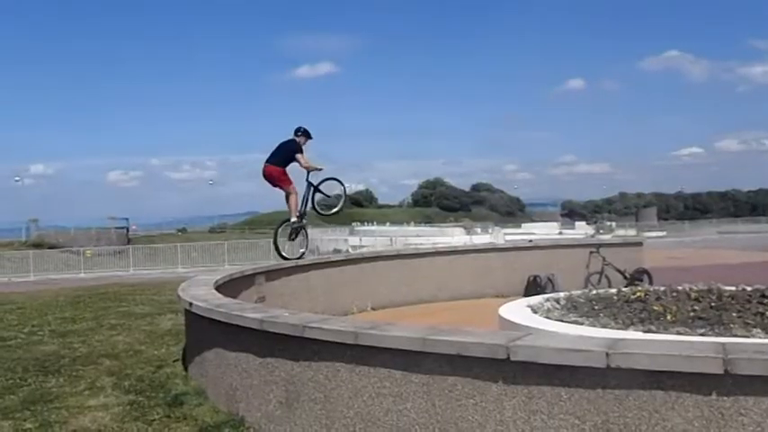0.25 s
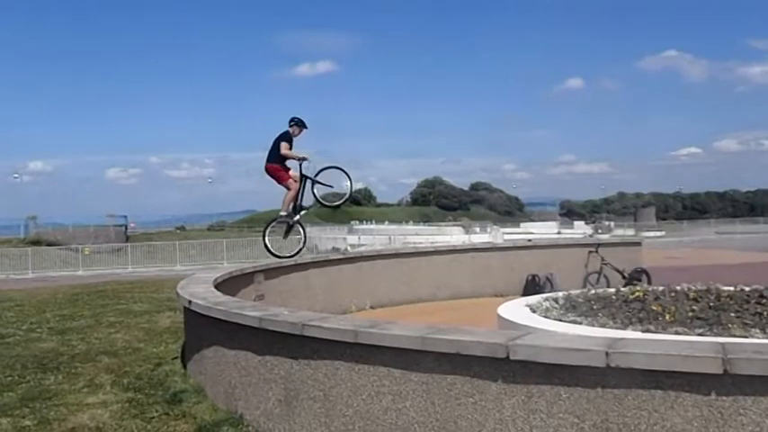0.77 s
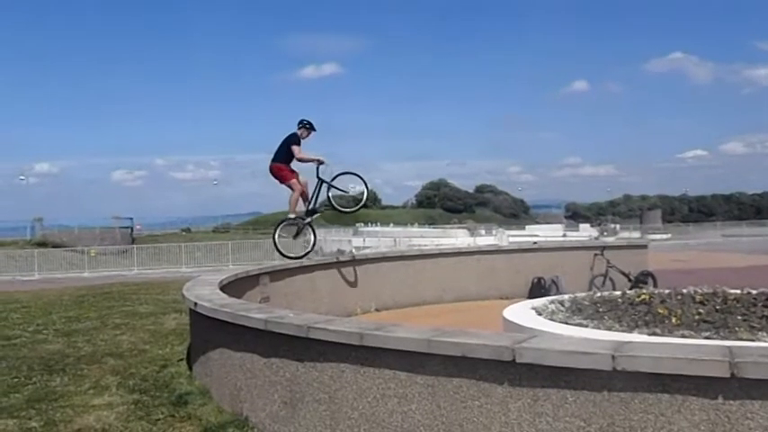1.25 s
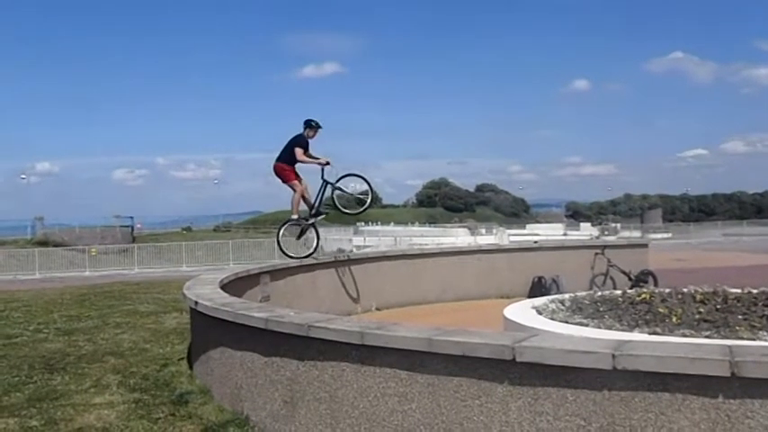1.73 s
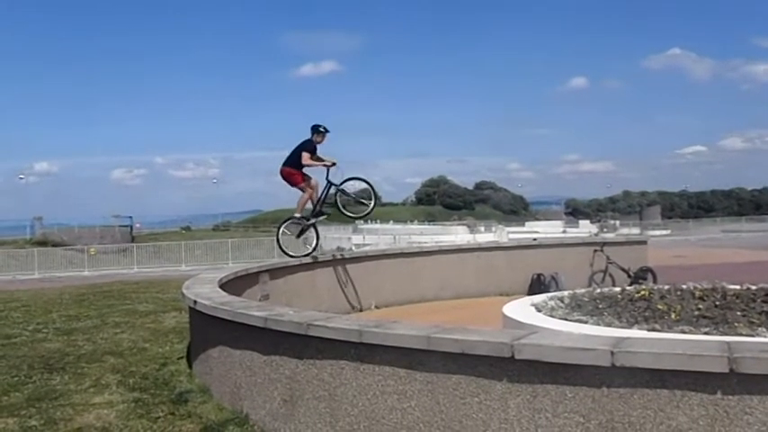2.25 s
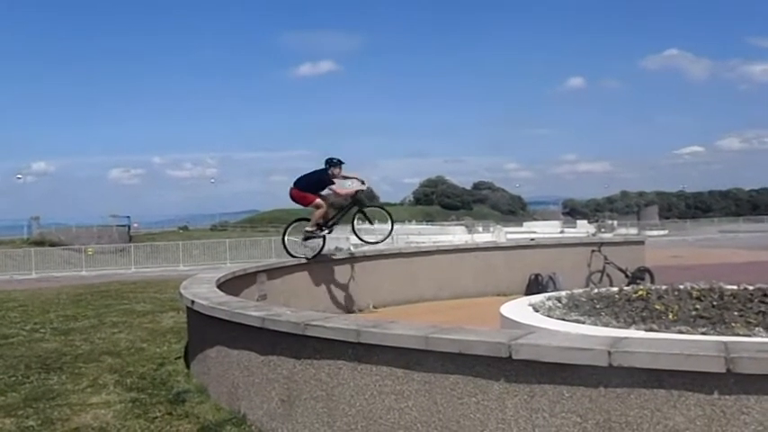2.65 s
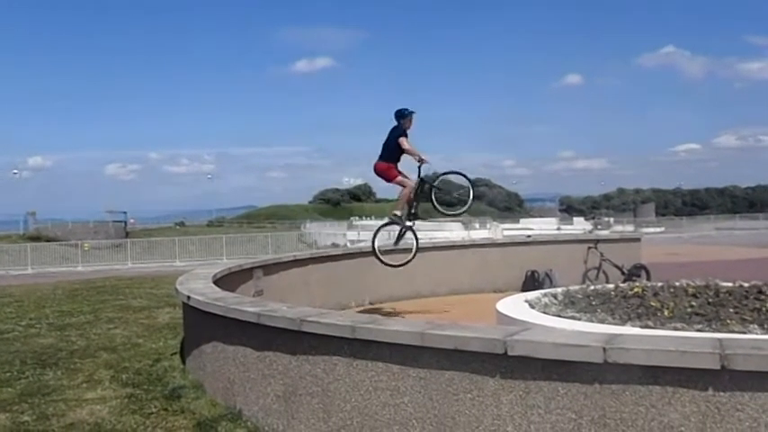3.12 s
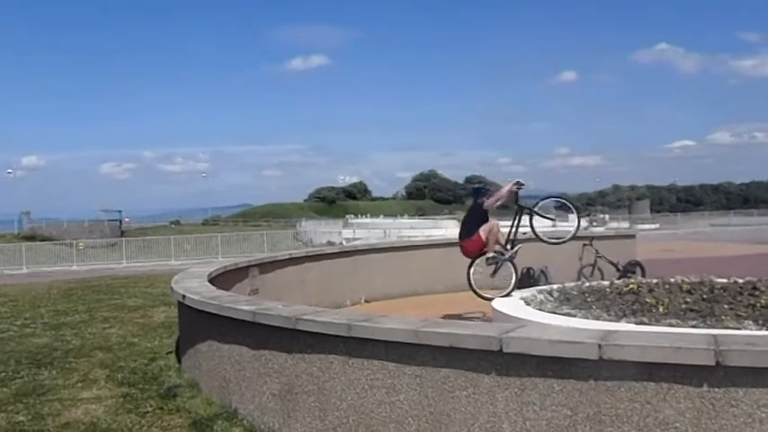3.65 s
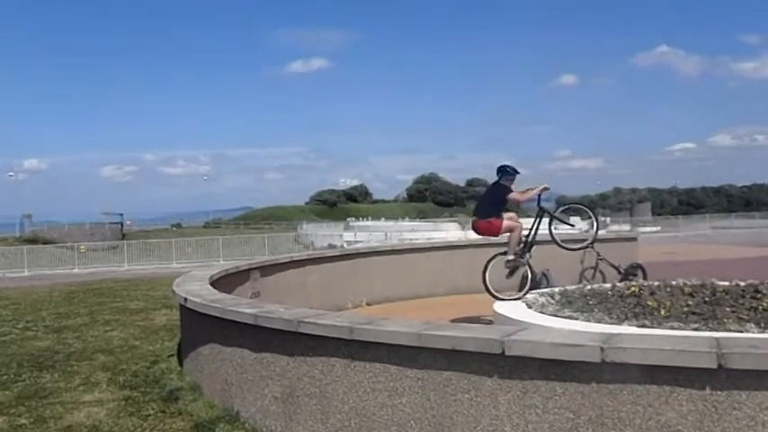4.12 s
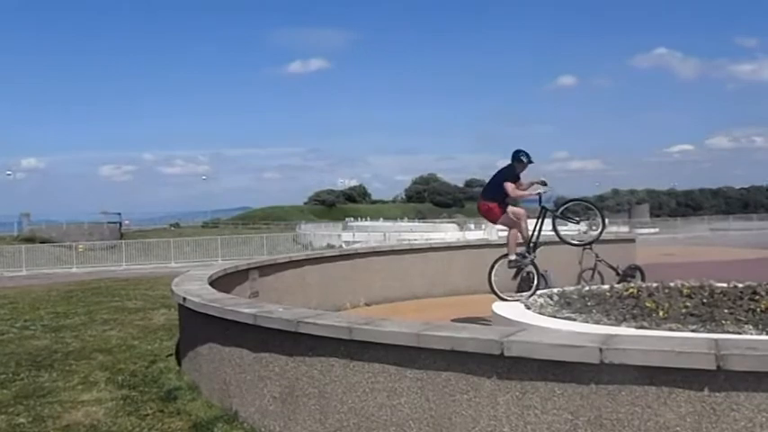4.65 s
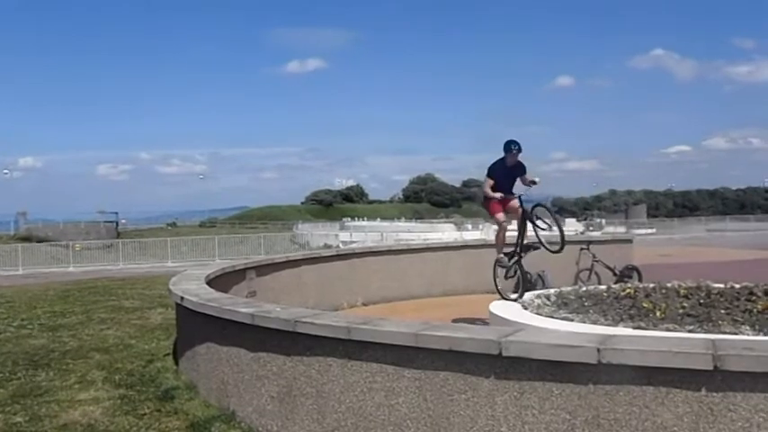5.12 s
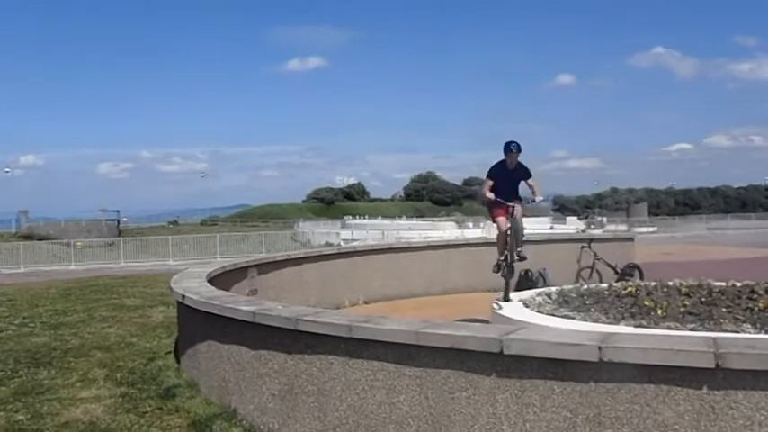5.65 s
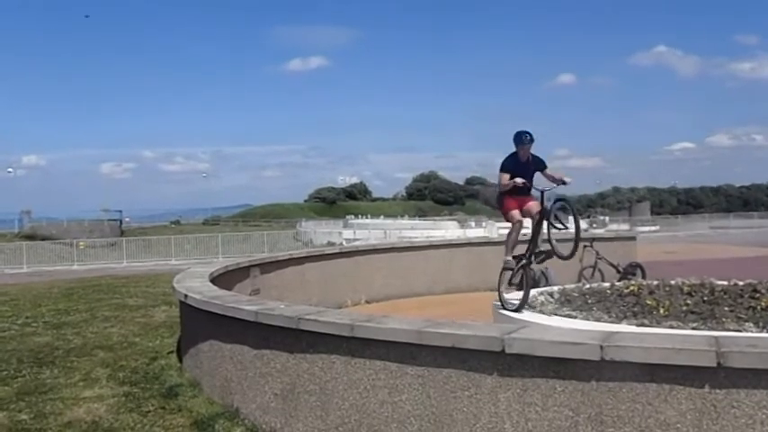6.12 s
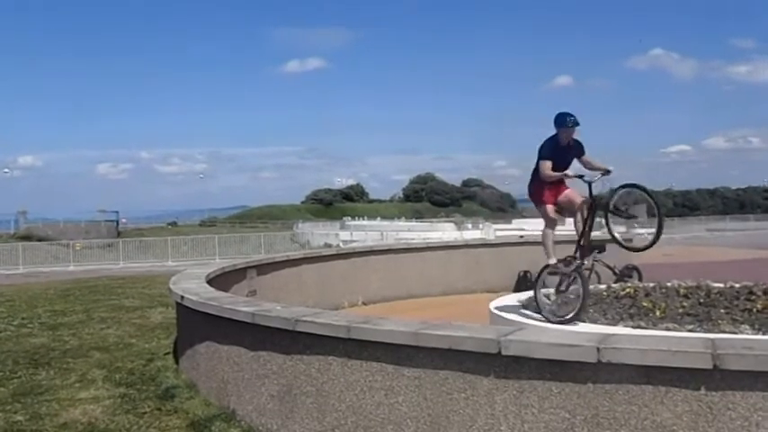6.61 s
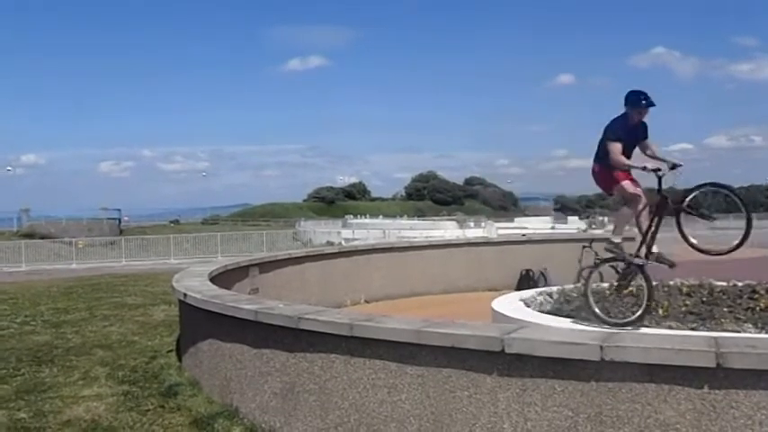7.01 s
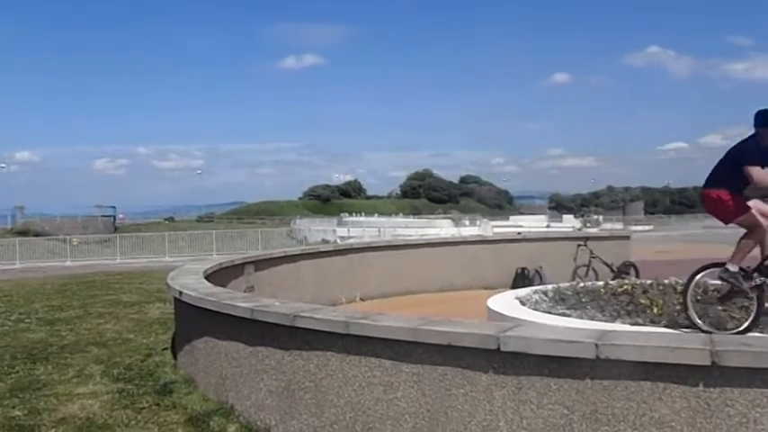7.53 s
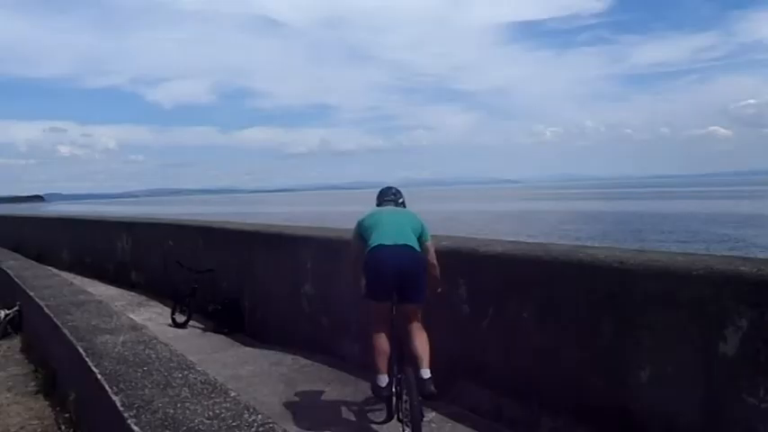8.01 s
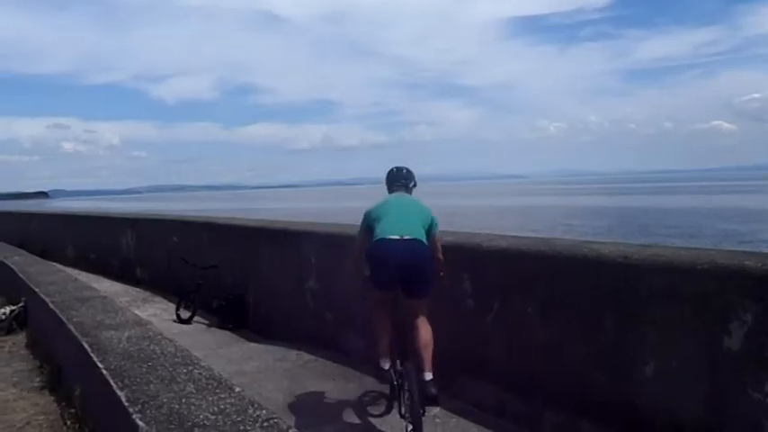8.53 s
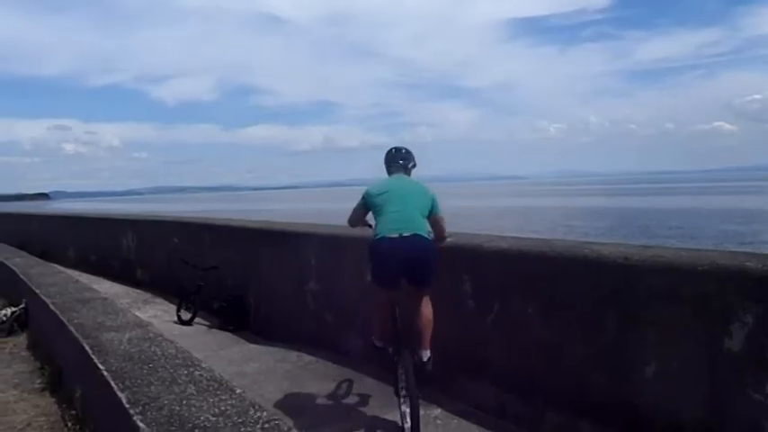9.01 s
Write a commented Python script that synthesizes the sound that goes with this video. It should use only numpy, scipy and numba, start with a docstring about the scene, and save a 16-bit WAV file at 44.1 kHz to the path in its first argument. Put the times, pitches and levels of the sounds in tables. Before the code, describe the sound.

A trials bicycle on concrete walls, heard by a single microphone in gusty wind. Isolated pawl clicks mark balancing; short ratchet whirs precede hops. Rim brakes grab with scraping, nasal honks, leaving metallic rim and spoke ringing. The loudest landing is a clustered clatter around 3.4 seconds. After more hops, the hiss and wind give way to a low, ebbing sea wash, a few clicks and one knock.

```python
"""Concrete walls by the sea, wind on the microphone; from 7.93 s a sea wall with the wash of the sea behind.
A trials bicycle hops on its back wheel. Pawl drops make the freewheel tick, and whir at pedal kicks.
On landing the rim brake grabs: stick-slip noise scrapes, harmonics honk briefly, rim and spokes ring on.
Coloured noise makes knocks, scuffs and cracks on the concrete, and the sea; narrow noise bands make
the brake pads squeak; low noise is wind. The microphone hisses with a thin whine until the sea wall."""
import sys
import numpy as np
from scipy import signal
from scipy.fft import rfft, irfft
from scipy.io import wavfile
from scipy.ndimage import uniform_filter1d
from numba import njit

SR = 44100
rng = np.random.default_rng(int(sys.argv[2]) if len(sys.argv) > 2 else 0)


def inscribe(sig):
    """Save sig as 16-bit PCM at rate SR to the path in sys.argv[1].

    A 1-D sig is mono; a 2-D sig holds one channel per row.
    Samples are clipped to [-1, 1] before scaling.
    """
    pcm = np.round(np.clip(np.atleast_2d(sig).T, -1, 1) * 32767)
    wavfile.write(sys.argv[1], SR, pcm.astype(np.int16))


N = 408366
T_S = np.arange(N) / SR

# open air and microphone hiss, spectrum: f/Hz, relative level/dB
AIR_COLOUR = [(240, -31), (400, -2.5), (569, -2.5), (643, -2), (1200, -4.5), (1300, -5), (2670, -10.5),
              (4920, -13.5), (5560, -8), (6480, -16), (13700, -17.5), (14600, -25), (15500, -72)]
# wash of the sea, spectrum: f/Hz, relative level/dB
SEA_COLOUR = [(71, -24), (120, -6.5), (238, 1.5), (350, -10.5), (455, -4), (524, -8), (1000, -2),
              (1560, -6.5), (2200, -20), (4030, -25.5), (5570, -20.5), (6960, -34.5), (13800, -36.5),
              (15000, -62)]
# breeze strength as level of its rumble: t/s, level/dB
BREEZE = [(0.0, -33), (0.1, -33.5), (1.39, -43), (1.47, -36.5), (2.6, -35), (2.86, -41.5), (3.79, -32.5),
          (4.28, -46), (5.13, -35.5), (5.21, -41), (6.03, -40), (6.29, -42.5), (6.81, -33.5), (7.43, -33.5),
          (7.79, -32), (7.94, -45), (8.97, -44.5), (9.26, -40)]
# gusts on top of the breeze, before rumble and flutter offsets: middle t/s, half width/s, level/dB
GUSTS = [(0.215, 0.04, -26), (0.37, 0.035, -30), (1.48, 0.022, -36.5), (1.64, 0.058, -37.5),
         (2.11, 0.027, -29.5), (2.21, 0.017, -20.5), (2.316, 0.017, -24.5), (2.54, 0.07, -27.5),
         (3.313, 0.013, -24.5), (3.391, 0.034, -17.5), (3.66, 0.048, -27), (3.835, .035, -18.5),
         (4.041, 0.036, -28.5), (5.085, 0.038, -34.5), (5.6, 0.023, -30.5), (5.88, 0.011, -25),
         (6.01, 0.041, -28), (6.146, 0.015, -28), (6.645, 0.023, -32), (6.8, 0.019, -17),
         (6.92, 0.051, -21), (7.3, 0.048, -24.5), (7.564, 0.045, -21.5), (7.745, 0.015, -22),
         (7.83, 0.023, -28)]
# single wind buffets: t/s, peak/dB, swing f/Hz
BUFFETS = [(0.067, -18.5, 171), (0.213, -14.5, 154), (3.317, -19, 253), (3.453, -17, 238),
           (6.017, -15, 135), (6.13, -20, 162), (6.742, -22.5, 423), (6.7978, -4.5, 277), (7.223, -21, 130),
           (7.601, -14, 196), (7.737, -16, 284)]
# single pawl drops as the rider balances: t/s, level/dB
PAWL_CLICKS = [(0.4463, -33.5), (0.906, -29), (1.2056, -32.5), (1.7204, -31.5), (2.0627, -30.5),
               (2.591, -24), (2.7396, -34), (2.8679, -31.5), (3.666, -34.5), (4.4813, -35.5),
               (4.9247, -27.5), (6.182, -25), (6.5894, -26), (6.631, -30.5), (7.506, -35), (8.115, -31),
               (8.4818, -29)]
# freewheel runs, slow when rolling, a whir at a kick:
# start t/s, end t/s, first rate/(clicks/s), last rate/(clicks/s), level/dB
PAWL_RUNS = [(0.0, 0.11, 112, 49, -31), (2.4017, 2.562, 45.5, 48, -31), (2.971, 3.082, 142, 160, -32),
             (3.155, 3.262, 76, 32, -29.5), (3.9065, 4.03, 36, 44, -32.5), (4.086, 4.399, 8.2, 4.8, -37),
             (5.2714, 5.389, 43, 50, -28.5), (5.836, 5.892, 137, 164, -27), (6.39, 6.474, 130, 150, -27.5),
             (6.969, 7.109, 190, 190, -27), (7.225, 7.332, 50, 61, -29), (7.7348, 7.767, 130, 130, -30),
             (8.146, 8.304, 123, 163, -31), (8.771, 9.049, 33, 24.6, -28)]
# pawl drop, spectrum: f/Hz, relative level/dB
PAWL_COLOUR = [(500, -7.5), (1500, -12), (2400, 0.5), (3600, -5), (4700, 3.5), (5400, 11), (6000, 6.5),
               (6700, -4), (7600, 2.5), (8800, -10), (11000, -14), (15000, -27)]
# tyre and frame knocks on concrete: t/s, level/dB, t60/s
KNOCKS = [(2.9371, -12, 0.076), (3.398, -14.5, 0.049), (3.41, -10, 0.047), (3.4251, -13.5, 0.041),
          (4.05, -32, 0.1), (6.061, -24, 0.026), (6.074, -30, 0.036), (6.259, -22, 0.035),
          (6.612, -24.5, 0.022), (6.7493, -21, 0.013), (6.804, -22, 0.073), (7.539, -27.5, 0.095),
          (8.741, -25.5, 0.14)]
# knock, spectrum: f/Hz, relative level/dB
KNOCK_COLOUR = [(200, -28), (700, -10), (1500, 0.5), (3000, -5), (4300, -5), (5400, 7), (6600, -4),
                (7700, -3), (9500, -12.5), (15000, -50)]
# tyre thuds and scuffs, landing or pivoting: middle t/s, half width/s, level/dB
SCUFFS = [(1.295, 0.018, -40.5), (2.942, 0.0022, -13.5), (4.058, 0.012, -29), (4.965, 0.012, -41.5),
          (6.25, 0.043, -45.5), (6.812, 0.01, -35.5), (7.815, 0.041, -32), (8.43, 0.011, -33.5),
          (9.075, 0.016, -28.5)]
# rubber on concrete, spectrum: f/Hz, relative level/dB
RUBBER_COLOUR = [(300, -36), (650, 3), (900, 5.5), (1200, -2.5), (1800, 1), (3000, -8.5), (5400, -7),
                 (8000, -16), (14000, -30)]
# brake pad squeaks: middle t/s, half width/s, level/dB, f/Hz
PAD_SQUEAKS = [(0.06, 0.056, -51, 2870), (6.44, 0.039, -46, 2260), (7.005, 0.031, -47, 2260)]
# metal striking the wall edge: t/s, level/dB
CRACKS = [(3.409, -13), (3.4251, -15.5), (5.896, -11)]
# blows that set the frame ringing: t/s, level/dB
JOLTS = [(2.94, -28.5), (3.412, -43.5), (7.79, -41)]
# long frame mode: f/Hz, level/dB, t60/s
FRAME_MODES = [(2019, -4, 0.75)]
# rim and sprocket modes: f/Hz, level/dB, t60/s
RIM_MODES = [(2258, -15, .25), (2463, -18, .25), (2642, -12, .25), (2864, -13, .3), (3440, -7, .3),
             (3790, -15, .3), (4344, 0, .27), (4976, -1, .34), (5204, 0, .32), (5530, -4, .33),
             (5955, -5, .22), (7300, -11, .2), (7476, -9, .26)]
# spoke harmonics: multiple of honk pitch, level/dB, t60/s
SPOKE_MODES = [(1, -5.5, 0.61), (2, -0.5, 0.52), (3, -11, 0.42)]
# brake grabs: t/s, rise/s, slide/s, scrape/dB, honk f/Hz, honk/dB, octave/dB, third harmonic/dB,
# spoke ring/dB, rim ring/dB
GRABS = [(0.128, 0.0079, 0.026, -19.5, 779, -24, -21.5, -24.5, -33.5, -51),
         (1.231, 0.042, 0.055, -33, 624, -47, -71, -51, -64, -44),
         (2.923, 0.015, 0.018, -11.5, 813.5, -28, -46, -23, -34.5, -31),
         (3.082, 0.02, 0.02, -12.5, 865, -19.5, -11, -26, -28.5, -36.5),
         (5.896, 0.0058, 0.0095, -12, 842, -39, -27.5, -55, -27.5, -41),
         (6.469, 0.0017, 0.01, -11.5, 852, -28, -28, -48, -26.5, -30.5),
         (7.114, 0.0029, 0.019, -14, 878, -18, -17.5, -27.5, -25.5, -27),
         (7.778, 0.0098, 0.011, -14.5, 904, -15.5, -13.5, -28, -34, -28),
         (9.058, 0.007, 0.018, -24, 799, -19, -25, -29, -35, -57)]
# brake scrape, spectrum: f/Hz, relative level/dB
SCRAPE_COLOUR = [(300, -40.5), (700, -5), (1200, -14.5), (2000, -9), (2700, -4), (3800, -6.5), (4400, -2),
                 (5700, 2), (6100, -0.5), (6700, -12.5), (7700, -3.5), (9200, -18), (12000, -29.5),
                 (16000, -82)]

AIR_DB = -50.5
SEA_START_S, SEA_START_DB, SEA_FADE_DB_PER_S = 7.93, -30, 4.5
RIM_RING_DB = -27.5  # re the knock or crack that starts it
HONK_JITTER_RATIO, HONK_SAG_RATIO = 0.016, 0.025  # shares of honk pitch
TOP_HZ = 15000


def undb(db):
    """Decibels to gain."""
    return 10 ** (np.asarray(db) / 20)


def unit(x):
    """Scale to rms 1."""
    return x / np.sqrt(np.mean(x ** 2))


def fade(t_s, t60_s):
    """Exponential decay from t = 0, held at 1 before."""
    return np.exp(-np.log(1000) * np.maximum(t_s, 0) / t60_s)


def add(out, start_s, x):
    """Mix x into out from start_s on."""
    i = max(int(start_s * SR), 0)
    out[i:i + len(x)] += x[:N - i]


def colour(x, points):
    """Minimum-phase filter through (Hz, dB) points, unit power gain for white noise."""
    hz, db = np.transpose(points)
    size = 2048
    f_hz = np.maximum(np.fft.rfftfreq(size, 1 / SR), 1)
    cepstrum = irfft(np.log(undb(np.interp(np.log(f_hz), np.log(hz), db))))
    # fold the cepstrum to make the response causal
    cepstrum[1:size // 2] *= 2
    cepstrum[size // 2 + 1:] = 0
    response = irfft(np.exp(rfft(cepstrum)))
    return signal.fftconvolve(x, response / np.linalg.norm(response))[:len(x)]


def walk(rate_hz, size=N):
    """Smooth random wandering, spread near 1: twice-averaged random steps."""
    k = max(int(SR / rate_hz), 1)
    steps = np.repeat(rng.standard_normal(size // k + 1), k)
    return unit(uniform_filter1d(uniform_filter1d(steps, k), k)[:size])


@njit
def lowpass(x, edge_hz):
    """Two-pole low-pass with a moving edge."""
    y, b, l = np.empty(len(x)), 0., 0.
    for i in range(len(x)):
        g = np.tan(np.pi * edge_hz[i] / SR)
        v = (b + g * (x[i] - l)) / (1 + g * (g + 1.414))
        y[i] = l + g * v
        b, l = 2 * v - b, 2 * y[i] - l
    return y


def band(lo_hz, hi_hz):
    """Noise between two edges, rms 1."""
    sos = signal.butter(2, [lo_hz, hi_hz], "band", fs=SR, output="sos")
    return unit(signal.sosfilt(sos, rng.standard_normal(N)))


def swells(rows):
    """Sum of Gaussian gain bumps: middle t/s, half width/s (to 1/e), level/dB."""
    return sum(undb(db) * np.exp(-((T_S - mid_s) / width_s) ** 2) for mid_s, width_s, db in rows)


def burst(t60_s, tail_db, tail_t60_s, rise_s=0.00078):
    """Noise clatter: fast decay plus a faint longer tail."""
    t_s = T_S[:SR // 4]
    decay = fade(t_s, t60_s) + undb(tail_db) * fade(t_s, tail_t60_s)
    return rng.standard_normal(len(t_s)) * np.minimum(t_s / rise_s, 1) * decay


def ring(modes, spread_ratio, swell_s, count):
    """Decaying modes, each made of count randomly detuned tones; close tones beat."""
    out, t_s = 0, T_S[:SR * 3 // 4]
    for hz, db, t60_s in modes:
        pitch_hz = hz * (1 + spread_ratio * rng.standard_normal((count, 1)))
        start_cycles = rng.random((count, 1))
        tones = np.sin(2 * np.pi * (pitch_hz * t_s + start_cycles)).sum(axis=0)
        decay = fade(t_s, t60_s)
        out = out + undb(db) * unit(tones * decay) * np.sqrt(np.mean(decay ** 2))
    return out * np.minimum(t_s / swell_s, 1)


def resonate(x, width_hz, gain=1.0):
    """Excitation lifted at the rim modes by parallel resonators, at half the modes' dB."""
    peaks = 0
    for hz, db, _ in RIM_MODES:
        b, a = signal.iirpeak(hz, hz / width_hz, fs=SR)
        peaks = peaks + undb(db / 2) * signal.lfilter(b, a, x)
    return (x + gain * peaks) / np.sqrt(1 + gain / 2)


def air_and_hiss(whine_db=-66):
    """Open air of wavering level, plus microphone hiss with a thin steady whine."""
    air = undb(AIR_DB + 0.5 * walk(4.24)) * colour(rng.standard_normal(N), AIR_COLOUR)
    return air + undb(whine_db) * band(8080, 8280)


def sea(waver_db=0.75):
    """Wash of the sea: wavering coloured noise that ebbs slowly."""
    ebb_db = SEA_START_DB - SEA_FADE_DB_PER_S * (T_S - SEA_START_S)
    return undb(ebb_db + waver_db * walk(21)) * colour(rng.standard_normal(N), SEA_COLOUR)


def background():
    """Open air and microphone hiss, cut to the sea at SEA_START_S."""
    return np.where(T_S < SEA_START_S, air_and_hiss(), sea())


def flutter(force, edge_hz, db_per_octave, eddy_db, low_hz, top_hz, calm_db=-38):
    """Small eddies on the microphone: stronger wind raises their low-pass edge."""
    force_db = 20 * np.log10(force + 1e-9)
    moving_hz = np.clip(edge_hz * 2 ** ((force_db - calm_db) / db_per_octave), 100, 900)
    eddies = lowpass(band(low_hz, top_hz), moving_hz) / np.sqrt(moving_hz / edge_hz)
    return force * eddies * unit(undb(eddy_db * walk(90)))


def buffets():
    """Single pressure swings, up then down."""
    out = np.zeros(N)
    for mid_s, db, hz in BUFFETS:
        u = 2 * np.pi * hz * (T_S - mid_s)
        out -= undb(db) * u * np.exp((1 - u ** 2) / 2)
    return out


def wind(breeze_rumble_db=0.0, breeze_flutter_db=-1, gust_rumble_db=-7, gust_flutter_db=4,
         rumble_spread_ratio=2.1, waver_db=1, lull_db=2):
    """Wavering breeze rumbles and flutters on the microphone; gusts and buffets ride on it."""
    breeze = undb(np.interp(T_S, *np.transpose(BREEZE)))
    # large eddies of a gust come earlier and leave later than small ones
    surges = swells([(s, width_s * rumble_spread_ratio, db + gust_rumble_db) for s, width_s, db in GUSTS])
    rumble_gain = np.hypot(breeze * undb(breeze_rumble_db + waver_db * walk(9.8)), surges)
    rumble = band(17, 91) * rumble_gain
    breeze_flutter = flutter(breeze * undb(breeze_flutter_db + lull_db * walk(22)), edge_hz=195,
                             db_per_octave=51, eddy_db=3.0, low_hz=103.5, top_hz=295)
    gust_flutter = flutter(swells(GUSTS) * undb(gust_flutter_db), edge_hz=163,
                           db_per_octave=26, eddy_db=3.0, low_hz=99, top_hz=463)
    return rumble + breeze_flutter + gust_flutter + buffets()


def freewheel(uneven_ratio=0.1, scatter_db=1.44, first_db=1.0):
    """Pawls drop into ratchet teeth, singly or in uneven runs; run rate follows the wheel."""
    out, drops = np.zeros(N), list(PAWL_CLICKS)
    for start_s, end_s, first_rate_hz, last_rate_hz, db in PAWL_RUNS:
        drops.append((start_s, db + first_db))
        s = start_s
        for slip, size in rng.standard_normal((40, 2)):
            gap_s = 1 / np.interp(s, [start_s, end_s], [first_rate_hz, last_rate_hz])
            s += gap_s
            if s < end_s:
                drops.append((s + uneven_ratio * slip * gap_s, db + scatter_db * size))
    for s, db in drops:
        add(out, s, undb(db) * burst(t60_s=0.026, tail_db=-22.5, tail_t60_s=0.39, rise_s=0.0012))
    return resonate(colour(out, PAWL_COLOUR), width_hz=41, gain=1.3)


def knocks():
    """Tyre and frame hit concrete: noise bursts lifted at the rim modes."""
    out = np.zeros(N)
    for s, db, t60_s in KNOCKS:
        add(out, s, undb(db) * burst(t60_s, tail_db=-24.0, tail_t60_s=0.37))
    return resonate(colour(out, KNOCK_COLOUR), width_hz=75)


def cracks():
    """Metal strikes the wall edge: sharp bursts across the treble."""
    out = np.zeros(N)
    for s, db in CRACKS:
        add(out, s, undb(db) * burst(t60_s=0.035, tail_db=-30, tail_t60_s=0.15))
    # f/Hz, relative level/dB
    return colour(out, [(1000, 1), (5000, -9), (8000, 10), (10000, -8), (15000, -8)])


def scuffs_and_pad_squeaks(grit_db=3, squeak_spread_hz=90):
    """Scuff noise of rubber on concrete, and narrow-band squeaks of the brake pads; random grit roughens both."""
    grit = undb(grit_db * walk(300))
    squeaks = np.zeros(N)
    for *swell, hz in PAD_SQUEAKS:
        squeaks += swells([swell]) * band(hz - squeak_spread_hz, hz + squeak_spread_hz)
    scuffs = colour(swells(SCUFFS) * grit * rng.standard_normal(N), RUBBER_COLOUR)
    return scuffs + squeaks * grit


def frame():
    """The frame's long mode rings after the jolts."""
    out = np.zeros(N)
    for s, db in JOLTS:
        add(out, s, undb(db) * ring(FRAME_MODES, spread_ratio=0.00082, swell_s=0.0035, count=1))
    return out


def rim(strike_db=2.0):
    """Grabs, knocks and cracks ring the rim; mode levels vary with the point struck, drawn at random."""
    out = np.zeros(N)
    blows = [(s, db) for s, *_, db in GRABS]
    blows += [(s, db + RIM_RING_DB) for s, db, *_ in KNOCKS + CRACKS]
    for s, rim_db in blows:
        modes = [(hz, db + strike_db * rng.standard_normal(), t60_s) for hz, db, t60_s in RIM_MODES]
        add(out, s, undb(rim_db) * ring(modes, spread_ratio=0.00331, swell_s=0.0028, count=3))
    return out


def spokes():
    """Each grab plucks the spokes, detuned by small tension differences."""
    out = np.zeros(N)
    for s, _, _, _, hz, *_, spoke_db, _ in GRABS:
        modes = [(k * hz, db, t60_s) for k, db, t60_s in SPOKE_MODES]
        add(out, s, undb(spoke_db) * ring(modes, spread_ratio=0.019, swell_s=0.012, count=16))
    return out


def grip(t_s, rise_s, slide_s, t60_s):
    """Pad force: ramps up on the bite, decays once the slide time is over."""
    return np.clip(t_s / rise_s, 0, 1) * fade(t_s - slide_s, t60_s)


def brake(lag_s=0.0027, scrape_t60_s=0.036, honk_t60_s=0.075, settle_s=0.037,
          slip_depth_ratio=0.99, tail_db=-28, tail_t60_s=0.81):
    """Pads stick and slip on the rim: scrape first, then a honk climbing to spoke pitch."""
    scrape, honk, t_s = np.zeros(N), np.zeros(N), T_S[:SR // 2]
    for s, rise_s, slide_s, scrape_db, hz, *harmonics_db, _, _ in GRABS:
        sag = HONK_SAG_RATIO * np.exp(-t_s / settle_s)
        pitch_hz = hz * (1 - sag + HONK_JITTER_RATIO * walk(372, len(t_s)))
        phase = 2 * np.pi * np.cumsum(pitch_hz) / SR
        slips = 1 + slip_depth_ratio * np.cos(phase)
        # a longer slide also decays more gently
        force = grip(t_s, rise_s, slide_s, scrape_t60_s + slide_s)
        force = force + undb(tail_db) * grip(t_s, rise_s, slide_s, tail_t60_s)
        add(scrape, s, undb(scrape_db) * force * slips * rng.standard_normal(len(t_s)))
        tone = sum(undb(db) * np.sin((k + 1) * phase) for k, db in enumerate(harmonics_db))
        # the honk feeds itself: squared envelope, gentle start; squaring halves the doubled t60
        swell = grip(t_s - lag_s, rise_s, slide_s, 2 * honk_t60_s) ** 2
        add(honk, s, np.sqrt(2) * tone * swell)
    return resonate(colour(scrape, SCRAPE_COLOUR), width_hz=44) + honk


def scene():
    """Bicycle in the open air, one channel."""
    surroundings = background() + wind()
    contacts = knocks() + cracks() + scuffs_and_pad_squeaks()
    bicycle = freewheel() + contacts + frame() + rim() + spokes() + brake()
    return (surroundings + bicycle)[None]


def record(dry):
    """Tanh rounds the loudest peaks; an elliptic low-pass cuts above TOP_HZ."""
    rounded = 1.392 * np.tanh(dry / 1.222)
    return signal.sosfilt(signal.ellip(8, 0.2, 70, TOP_HZ, fs=SR, output="sos"), rounded)


dry = scene()
out = record(dry)
inscribe(out)
```